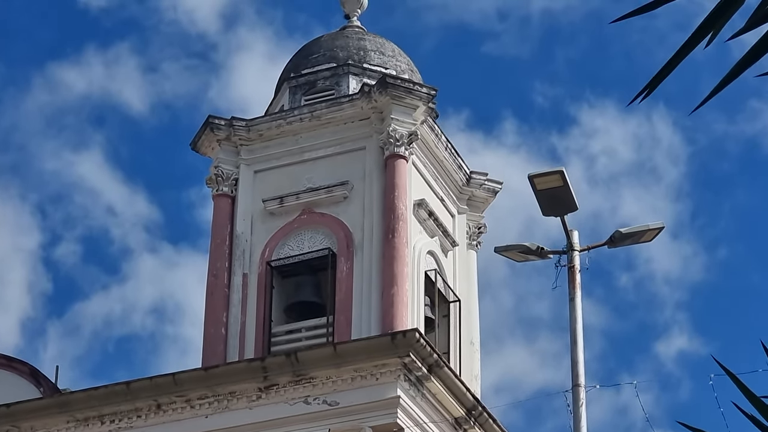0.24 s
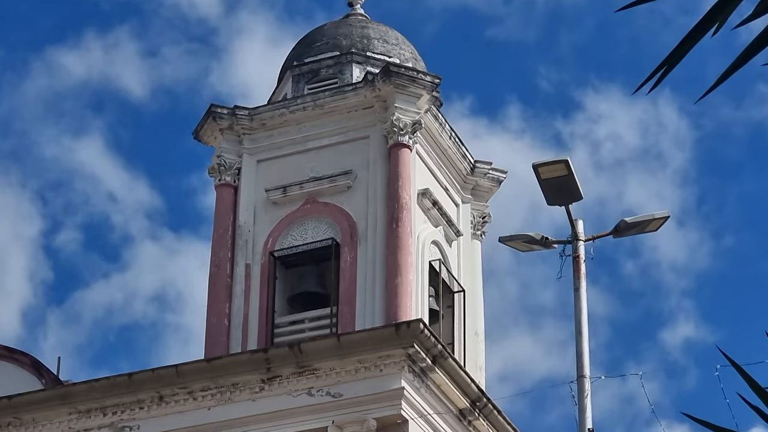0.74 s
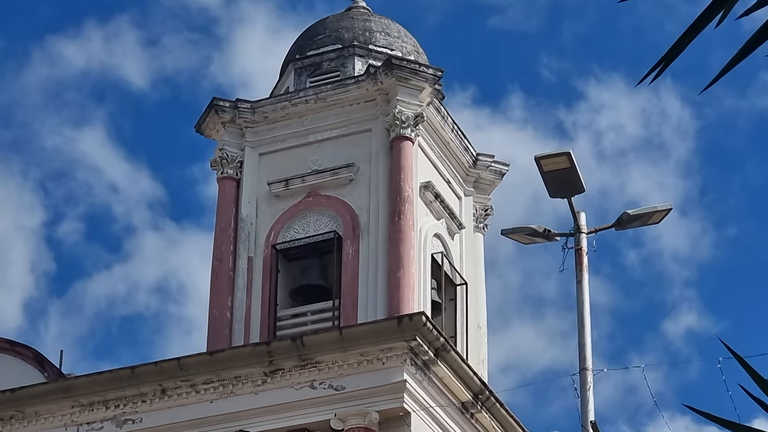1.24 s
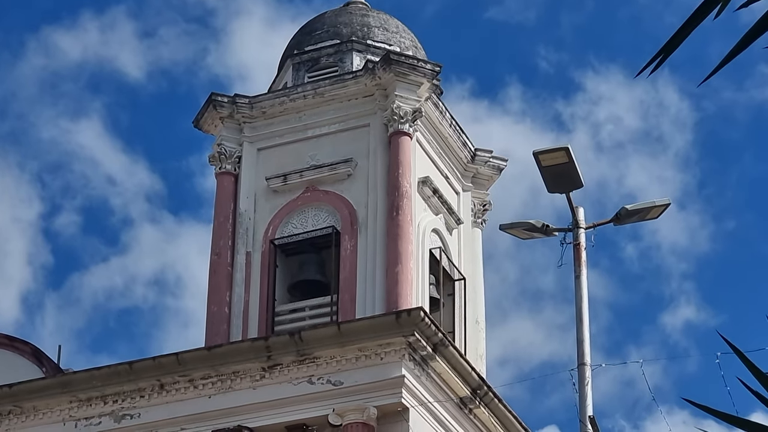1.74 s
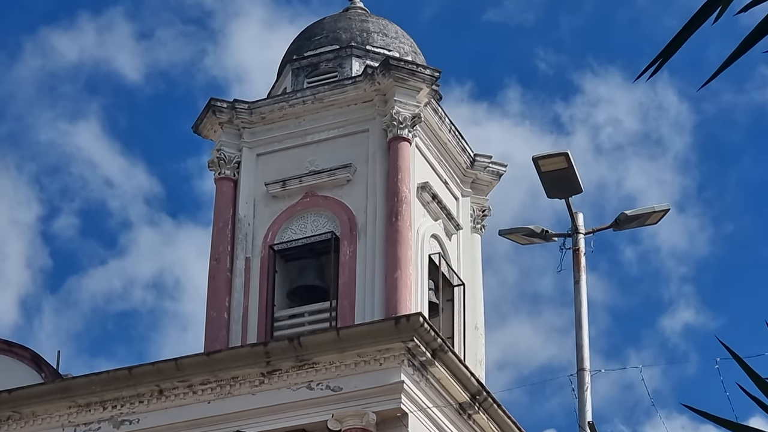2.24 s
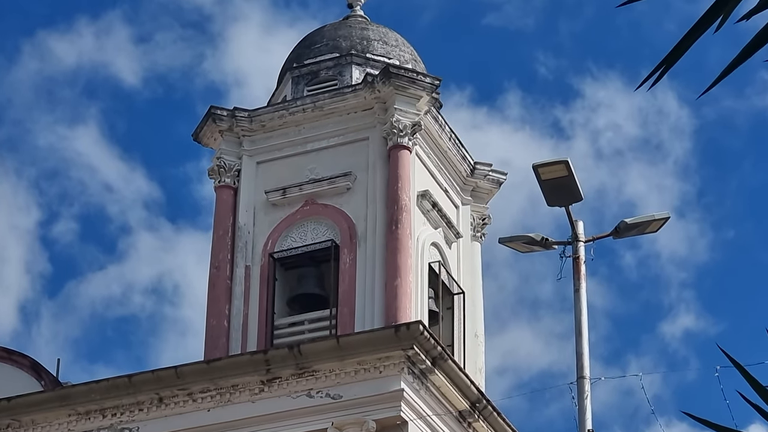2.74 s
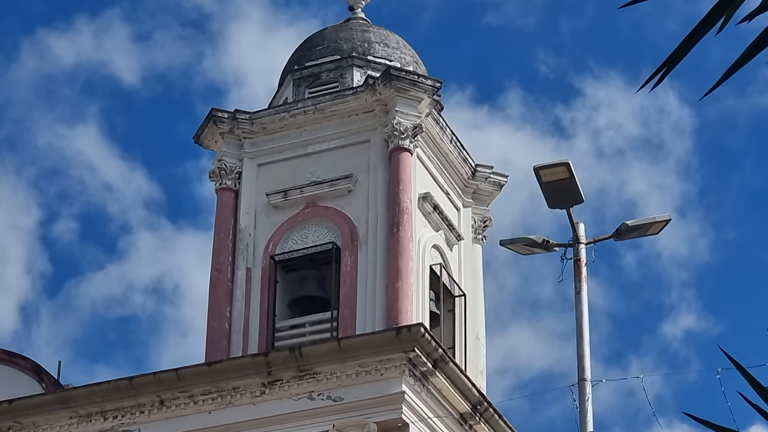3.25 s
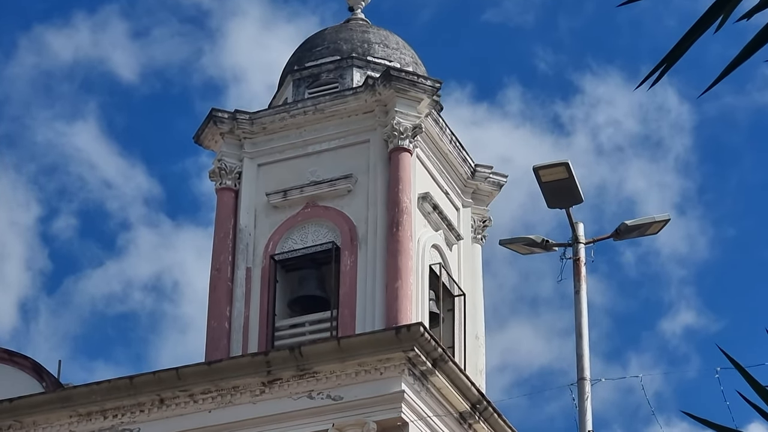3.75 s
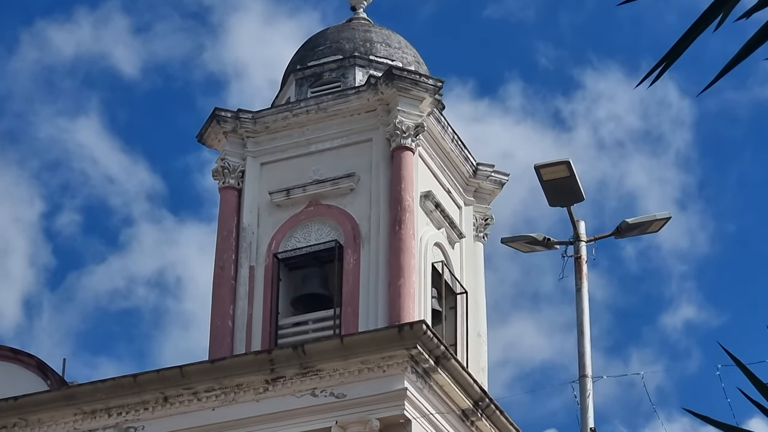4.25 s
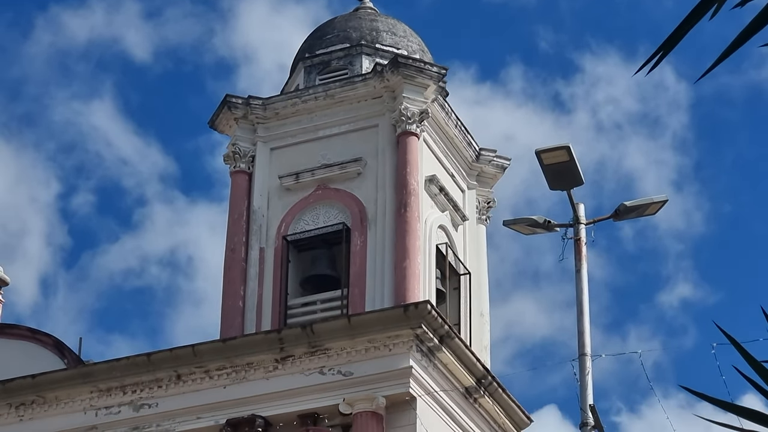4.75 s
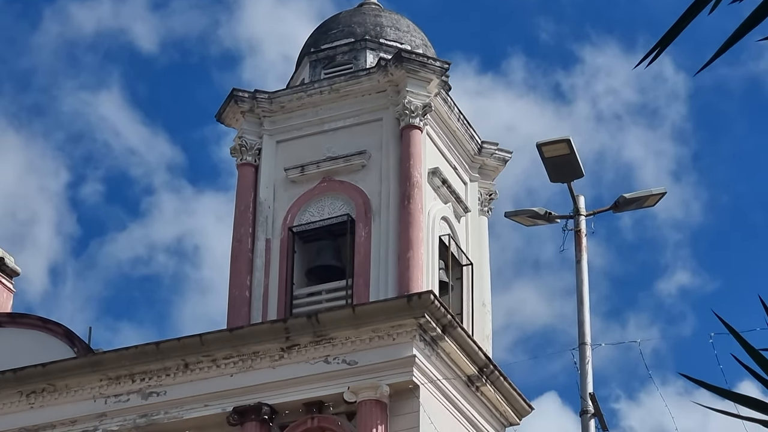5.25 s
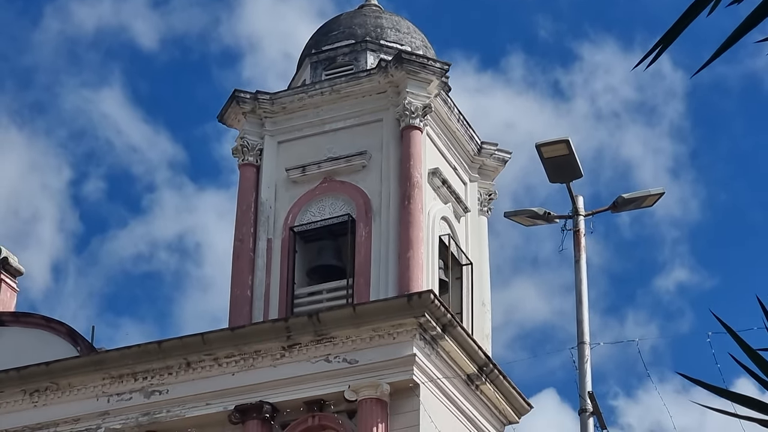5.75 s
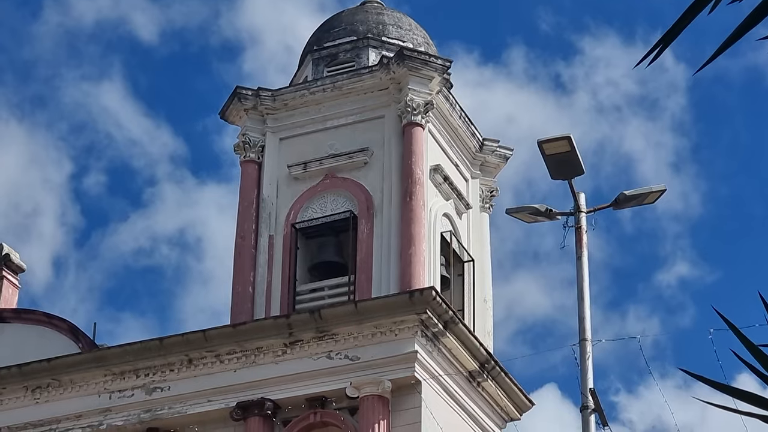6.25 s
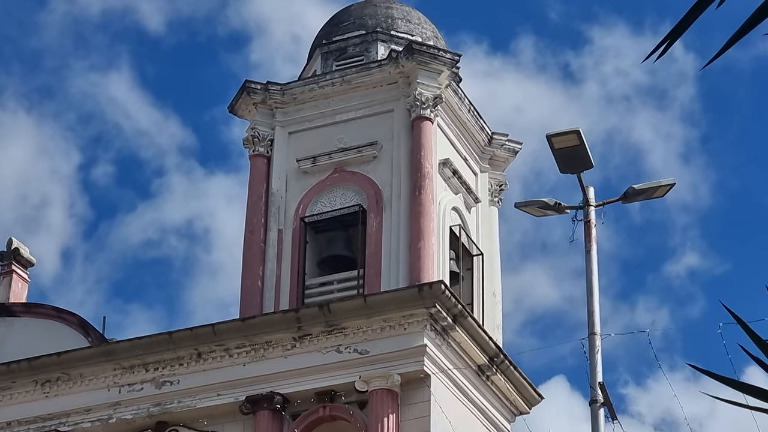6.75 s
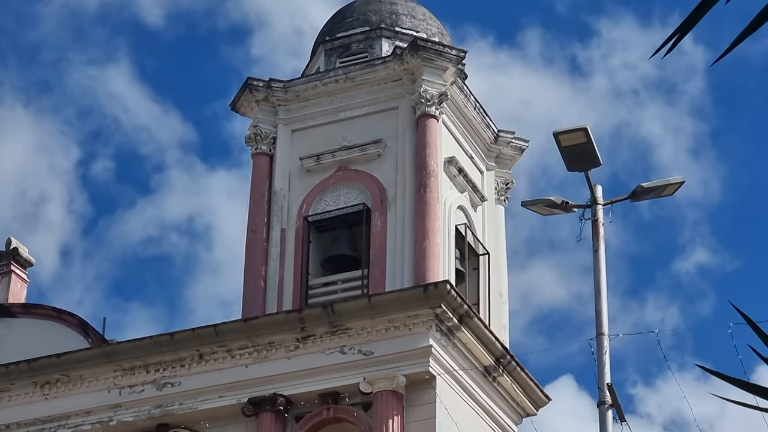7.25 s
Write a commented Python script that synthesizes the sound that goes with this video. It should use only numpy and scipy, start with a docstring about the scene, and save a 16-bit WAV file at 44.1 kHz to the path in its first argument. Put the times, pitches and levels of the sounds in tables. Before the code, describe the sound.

A large church bell is struck twice, nearly five seconds apart, each hard clang ringing bright and shimmering before fading over faint street rumble.

```python
"""Low traffic rumbles and hisses in the street below a bell tower, and a steady drone beats slowly.
A large church bell is struck, and struck again 4.7 s later: each blow is a clang of noise round the belfry.
Pairs of close partials then beat as they fade, and the deepest hum on from stroke to stroke.
Between and after the blows come a few faint ticks, made of resonant noise, and two wavering whistles.
The gain control drops at each blow and creeps back, so hum and street swell as the bell fades."""
import sys
import numpy as np
from scipy import signal
from scipy.io import wavfile
from scipy.ndimage import uniform_filter1d

SR = 44100
rng = np.random.default_rng(int(sys.argv[2]) if len(sys.argv) > 2 else 0)


def generate_wav(signal):
    """Clip the signal to [-1, 1] and save it as 16-bit WAV at the path in sys.argv[1]."""
    frames = np.transpose(np.atleast_2d(signal))
    scaled = np.clip(frames, -1, 1) * 32767
    pcm = np.round(scaled).astype(np.int16)
    wavfile.write(sys.argv[1], SR, pcm)


N = 331191

# The blows of the clapper. Each row: start in seconds, scale of the clang in dB.
STROKES = [(0.033, -17.5), (4.702, -15.5)]


def from_db(db):
    """Turn decibels into a gain."""
    return 10 ** (np.asarray(db) / 20)


def rms_one(x):
    """Scale to rms 1."""
    return x / np.sqrt(np.mean(np.abs(x) ** 2) + 1e-20)


def at_hz(points, hz):
    """Read a curve of (Hz, value) on a log-frequency axis."""
    points = np.array(points)
    return np.interp(np.log(hz), np.log(points[:, 0]), points[:, 1])


def fade(age, t60):
    """Gain of a ring that loses 60 dB in t60 seconds."""
    return np.exp(-np.log(1000) * age / t60)


def since(s):
    """First sample of an event, and the seconds elapsed from there to the end."""
    start = round(max(s, 0) * SR)
    return start, np.arange(N - start) / SR


def drift(rate_hz):
    """Random wandering of rms 1: noise through two equal one-pole lowpasses with their corner at rate_hz."""
    step = 200  # samples between drawn values, joined by straight lines
    pole = np.exp(-2 * np.pi * rate_hz * step / SR)
    white = rng.standard_normal(N // step + 502)
    slow = signal.lfilter([1], [1, -2 * pole, pole * pole], white)[500:]  # skip the filter's start
    return np.interp(np.arange(N) / step, np.arange(len(slow)), rms_one(slow))


def beating(age, twin_db, beats, lull_s):
    """A mode and its close twin drift in and out of step, opposed at lull_s and once per beat."""
    return 1 - from_db(twin_db) * np.exp(-2j * np.pi * beats * (age - lull_s))


def placed(pan_db, lead):
    """Complex left and right gains of a tone, from its level difference in dB and left phase lead in rad."""
    levels = from_db(np.array([[pan_db], [-pan_db]]) / 2)
    phases = np.exp(.5j * np.array([[lead], [-lead]]))
    return rms_one(levels * phases)


def noise_bands(count=22):
    """Diffuse stereo noise in narrow bands, as a list of (centre Hz, band); mid and side set its width."""
    # Left-right likeness of diffuse sound. Each row: frequency in Hz, correlation from -1 to 1.
    likeness = [(60, 0.9), (300, 1), (1000, -0.017), (2000, -0.49), (4000, 0.11), (10000, -0.72)]
    edges = np.geomspace(22, 16000, count + 1)
    white = rng.standard_normal((2, 2, N))
    bands = []
    for k, (low, high) in enumerate(zip(edges, edges[1:])):
        bandpass = signal.butter(3, [low, high], "band", fs=SR, output="sos")
        mid, side = signal.sosfilt(bandpass, white[k % 2])  # neighbours use different noise
        hz = np.sqrt(low * high)
        alike = np.clip(at_hz(likeness, hz), -1, 1)
        bands.append((hz, np.sqrt(1 + alike) * mid + np.sqrt(1 - alike) * side * [[1], [-1]]))
    return bands


def partials(flutter_hz=8.5, rise_s=0.012):
    """Twin modes build up in the belfry and beat; moving air and echoes make the higher ones flutter more."""
    # Ringing partials, split into close twins because the bell is not quite round.
    # Each row: frequency in Hz, level on the first and on the second stroke in dB, t60 in seconds,
    # beats per second, seconds to the first lull, twin's relative level in dB,
    # left-right difference in dB, left lead in rad.
    twin_modes = [(777.4, -38, -40.5, 4.7, 1.2, 1.06, -13.5, -6, 0.76),
                  (1009.4, -23, -18.5, 3.13, 0.93, 0.74, -5.5, -7, -0.0),
                  (1241.0, -20.5, -22, 2.61, 0.71, 0.54, -5.5, 0, -1.0),
                  (1332.3, -22, -23, 2.98, 0.78, 0.26, -9, -2.5, -1.27),
                  (1400.3, -23, -23, 2.78, 0.76, 0.23, -3, -1, -1),
                  (1514.7, -17.5, -17.5, 5.47, 2.508, 0.17, -4.5, -5.0, -1),
                  (1638.5, -18.5, -20, 2.76, 0.39, 0.15, -5.5, -3.5, -1.2),
                  (2070, -33.5, -52.5, 0.44, 0.75, 0.31, -8, -7, 5),
                  (2084.5, -20, -19.5, 3.26, 2.56, 0.39, -8, -8.5, 1.96),
                  (2200, -23.5, -30.5, 1.5, 0.45, 0.07, -5, -11, -2.2),
                  (2315, -28.5, -24, 2.39, 0.76, 0.22, -9, -5.5, 0.4),
                  (2350, -29, -36, 1.5, 0.72, 0.14, -9.5, -12, 4.5),
                  (2705, -9, -11.5, 3.16, 2.874, 0.016, -8, -10.5, 4),
                  (2934, -27.5, -31.5, 2, 1.4, 0.34, -15.5, -9.5, -4.5),
                  (3107, -24.5, -32.5, 2.2, 1, 0.15, -20, -10, -1.5),
                  (3364, -10, -11.5, 1.94, 0.52, 0.43, -1.5, -6.5, -2),
                  (3538, -47, -40, 2.4, 1.8, 0.13, -4, -13, 16.5),
                  (3934, -30, -33, 3.15, 0.62, 0.74, -3, -6, -2),
                  (4043, -17, -17, 2.365, 2.98, 0.057, -6.5, -6, -1.7),
                  (4600, -28.5, -46, 1.4, 0.71, 0.09, -15.5, -5, 4.5),
                  (4745, -15.5, -14, 1.94, 0.91, 0.54, -8.5, -12, -0.6),
                  (4840, -22, -20.5, 1.52, 0.62, 0.05, -6.5, -11, -1.8),
                  (4955.0, -31, -44, 3.1, 1.5, 0.26, -7.5, -10.5, 3),
                  (5430, -28, -37, 1.7, 0.74, 0.41, -4.5, 1, 5),
                  (6040, -43.5, -41, 1.8, 2.6, 0.13, -6, 14.5, 4),
                  (7000, -47, -36.5, 1.3, 2.2, 0.07, -15.5, 9, 0)]
    # A third close mode makes some beating uneven; a row acts only on partials within 40 Hz.
    # Each row: frequency of the partial in Hz, relative level in dB, beats per second,
    # seconds to the first lull.
    third_modes = [(1009, -5.5, 0.58, 0.29), (1514.7, -11, 0.82, 0.68), (2704, -10, 1.25, 0.76),
                   (3363, -10, 1.47, 0.12), (4044.3, -12, 1.12, 0.67), (4690, 4, 2.69, 0.046)]
    out = np.zeros((2, N))
    t = np.arange(N) / SR
    for hz, first_db, second_db, t60, beats, lull_s, twin_db, pan_db, lead in twin_modes:
        age = t[:int(t60 * 1.2 * SR)]  # until 72 dB down
        beat = beating(age, twin_db, beats, lull_s)
        for partial_hz, third_db, third_beats, third_lull_s in third_modes:
            if abs(hz - partial_hz) < 40:
                beat = beat * beating(age, third_db, third_beats, third_lull_s)
        carrier = np.exp(2j * np.pi * (hz * age + rng.random()))
        ring = beat * carrier * fade(age, t60) * (1 - np.exp(-age / rise_s))
        tone = np.zeros(N, complex)
        for (s, _), db in zip(STROKES, (first_db, second_db)):
            start = round(s * SR)
            tone[start:start + len(ring)] += from_db(db) * ring[:N - start]
        depth = .24 * hz / 3500
        flutter = 1 + depth * (drift(flutter_hz) + 1j * drift(flutter_hz))
        tone *= flutter / np.sqrt(1 + 2 * depth ** 2)  # keeps the mean power
        for ear, heard in zip(out, placed(pan_db, lead) * tone):
            ear += heard.real * (1 + .5 * depth * drift(flutter_hz))  # each side also flutters alone
    return out


def clang(tail_db=-31, tail_t60=3.2, knock_db=-1.5, knock_t60=0.14, rise_s=0.0039):
    """The hard knock of the clapper, its scatter off the belfry walls, and a faint longer tail."""
    # Spectrum of the clang. Each row: frequency in Hz, relative density in dB per Hz.
    spectrum = [(100, -27.5), (260, -18.5), (370, -25), (520, -13), (720, -5.5), (1050, 2), (1400, 13),
                (1800, -1.5), (2400, 4.5), (3700, -10.5), (4900, -4), (6500, -31.5), (10000, -40.5),
                (15000, -35)]
    # Decay of the scatter. Each row: frequency in Hz, t60 in seconds.
    scatter_t60 = [(200, 0.25), (1000, 0.25), (3000, 0.76), (6000, 0.22), (14000, .5)]
    bands = [(hz, band * from_db(at_hz(spectrum, hz))) for hz, band in noise_bands()]
    total = np.std(sum(band for _, band in bands))
    out = np.zeros((2, N))
    for s, db in STROKES:
        start, age = since(s)
        rise = 1 - np.exp(-age / rise_s)
        knock = from_db(knock_db) * fade(age, knock_t60)
        tail = from_db(tail_db) * fade(age, tail_t60)
        for hz, band in bands:
            dying = knock + fade(age, at_hz(scatter_t60, hz)) + tail
            out[:, start:] += from_db(db) / total * band[:, start:] * dying * rise
    return out * placed(-2.5, 0).real


def clonk(rise_s=0.012):
    """Each blow also wakes a few heavily damped resonances that give it weight."""
    # Damped resonances of the blow. Each row: frequency in Hz, level in dB, t60 in seconds.
    resonances = [(477.3, -25.5, 0.5), (1007, -20.5, 0.88), (1370, -33.5, .6)]
    out = np.zeros((2, N))
    for s, _ in STROKES:
        start, age = since(s)
        rise = 1 - np.exp(-age / rise_s)
        for hz, db, t60 in resonances:
            out[:, start:] += from_db(db) * np.sin(2 * np.pi * hz * age) * fade(age, t60) * rise
    return out


def shimmer(count=230, throb=0.42, rise_s=0.006):
    """Many weak, short-lived, throbbing modes fill the gaps between partials; both blows wake the same ones."""
    # Middle level of the crowd of upper modes. Each row: frequency in Hz, level in dB.
    mode_level = [(1300, -38.5), (2300, -31), (3500, -45), (5000, -34), (6300, -54.5), (9000, -55.5),
                  (13500, -57.5), (15500, -71.5)]
    # Their middle decay. Each row: frequency in Hz, t60 in seconds.
    mode_t60 = [(1300, 0.8), (5000, 1.28), (9000, 1.4), (13800, 0.83), (15000, 0.5)]
    # Where they are heard. Each row: frequency in Hz, left-right difference in dB.
    mode_pan = [(1300, 12.5), (2500, 3), (5000, -1), (8000, 4), (13000, -5.5)]
    out = np.zeros((2, N))
    age = np.arange(2 * SR) / SR
    rise = 1 - np.exp(-age / rise_s)
    # jittered steps on a square-root scale: wider apart towards the top
    low, high = np.sqrt(1300), np.sqrt(15300)
    steps = (np.arange(count) + rng.uniform(-1, 1, count)) / count
    pitches = (low + (high - low) * steps) ** 2
    chances = rng.uniform(-0.9, 1, (count, 6))
    for hz, (size, life, side, lead, turn, beats) in zip(pitches, chances):
        t60 = at_hz(mode_t60, hz) * (1 + .25 * life)
        dying = fade(age, t60) - fade(age[-1], t60)  # reaches zero after two seconds
        gain = from_db(at_hz(mode_level, hz) + 6 * size) * dying * rise
        gain *= 1 + throb * np.cos(2 * np.pi * (8 * beats * age + turn))  # up to 8 beats per second
        pan_db = at_hz(mode_pan, hz) + 5 * side
        tone = placed(pan_db, np.pi * lead) * np.exp(2j * np.pi * (hz * age + turn))
        out[:, :len(age)] += tone.real * gain
    return sum(np.roll(out, round(s * SR), axis=1) for s, _ in STROKES)


def hum(waver=0.086, rise_s=0.015):
    """Each blow sets the deep twins ringing afresh, in a new balance; they beat slowly and fade slowly."""
    # Deep twin partials that outlast the gap between strokes.
    # Each row: frequency in Hz, level on the first and on the second stroke in dB,
    # twin's relative level on the first and on the second in dB, t60 in seconds, beats per second,
    # seconds to the first lull, left-right difference in dB, left lead in rad.
    deep_modes = [(260.3, -44, -36.5, -32, -1.5, 50, 0.4, 0.63, 0, -0.12),
                  (480.1, -47, -35, -3.5, -9, 45, 0.12, 1.38, -3.5, 0.88),
                  (596.6, -37, -39, -5.5, -6.5, 16.4, 0.25, 3.3, -0.5, -0.42)]
    out = np.zeros((2, N))
    t = np.arange(N) / SR
    for hz, first_db, second_db, first_twin_db, second_twin_db, t60, beats, lull_s, pan_db, lead in deep_modes:
        swell = np.zeros(N)
        for (s, _), db, twin_db in zip(STROKES, (first_db, second_db), (first_twin_db, second_twin_db)):
            start, age = since(s)
            fresh = from_db(db) * np.abs(beating(age, twin_db, beats, lull_s)) * fade(age, t60)
            # the new ring takes over from the old one
            swell[start:] += (fresh - swell[start:]) * (1 - np.exp(-age / rise_s))
        tone = (placed(pan_db, lead) * np.exp(2j * np.pi * hz * t)).real
        out += tone * swell * (1 + waver * drift(6))
    return out


def drone(hz=287.8, level_db=-53, t60=90, beats=0.513, lull_s=1.02, twin_db=-1.5):
    """Two nearly equal twins almost cancel about every two seconds, perhaps a neighbouring bell still humming."""
    t = np.arange(N) / SR
    twins = beating(t, twin_db, beats, lull_s)
    return from_db(level_db) * (twins * np.exp(2j * np.pi * hz * t)).real * fade(t, t60)


def street(hiss_db=-61.5, lumpy_db=1.5, hiss_pan_db=-3.5):
    """Traffic rumbles unevenly under a soft hiss; both are banded noise, and the hiss bands flicker slightly."""
    # Level of the traffic rumble. Each row: time in seconds, level in dB.
    rumble_level = [(0, -52.5), (3.2, -55.5), (4.1, -52), (5, -58), (7.5, -59)]
    # Spectra of rumble and of hiss. Each row: frequency in Hz, relative density in dB per Hz.
    rumble_spectrum = [(25, -27.5), (45, -14), (65, 2), (90, 4.5), (120, 0.5), (160, -19), (250, -6),
                       (400, -37), (800, -55)]
    hiss_spectrum = [(150, 3.5), (400, 7.5), (800, 4.5), (1500, -1), (2200, 3.5), (3200, 0.5), (4300, -8.5),
                     (5400, -12.5), (6800, -38.5), (9000, -33.5), (12500, -27.5), (15500, -44)]
    bands = noise_bands()
    rumble = rms_one(sum(band * from_db(at_hz(rumble_spectrum, hz)) for hz, band in bands))
    hiss = rms_one(sum(band * from_db(at_hz(hiss_spectrum, hz) + lumpy_db * drift(6.6)) for hz, band in bands))
    seconds, levels_db = np.transpose(rumble_level)
    rumble_gain = from_db(np.interp(np.arange(N) / SR, seconds, levels_db))
    return rumble * rumble_gain + hiss * from_db(hiss_db) * placed(hiss_pan_db, 0).real


def ticks(sharpness=2.0):
    """Each tick is a short, dying burst of noise in one broad resonance."""
    # Small ticks, scuffs and a knock nearby.
    # Each row: start in seconds, level before the fade in dB, centre in Hz, t60 in seconds.
    tick_rows = [(1.709, -62, 5570, 0.023), (2.42, -61, 2900, 0.76), (3.361, -68.5, 5770, 0.047),
                 (3.408, -74, 5800, .05), (3.992, -67, 5600, .03), (4.168, -70.5, 5800, .04),
                 (4.318, -71, 5600, .03), (4.428, -58.5, 2510, 1), (6.49, -69, 5630, .05),
                 (7.028, -55.5, 2960, 0.28), (7.08, -71, 5800, .04), (7.244, -69, 5470, 0.038),
                 (7.373, -71, 5370, 0.044)]
    out = np.zeros((2, N))
    for s, db, hz, t60 in tick_rows:
        start, age = since(s)
        age = age[:SR // 2]
        b, a = signal.iirpeak(hz, sharpness, fs=SR)
        burst = rng.standard_normal((2, len(age)))
        for _ in range(2):
            burst = signal.lfilter(b, a, burst)
        out[:, start:start + len(age)] += from_db(db) * rms_one(burst) * fade(age, t60)
    return out


def whistles(waver_hz=18):
    """Each whistle is a sine that swells and fades on one unsteady pitch."""
    # Faint whistles far down the street.
    # Each row: start in seconds, length in seconds, frequency in Hz, peak level in dB.
    whistle_rows = [(2.38, 0.37, 2965, -64.5), (4.0, 0.39, 2130, -69)]
    out = np.zeros(N)
    t = np.arange(N) / SR
    for s, length, hz, db in whistle_rows:
        swell = np.sin(np.pi * np.clip((t - s) / length, 0, 1))
        turns = np.cumsum(hz + waver_hz * drift(32)) / SR
        out += from_db(db) * swell * np.sin(2 * np.pi * turns)
    return out


def gain_control(x, ceiling_db=-10, recovery_db_per_s=2, max_gain_db=12):
    """The gain drops at once to hold a loud sound to the ceiling, and recovers at a steady rate."""
    power = uniform_filter1d(np.mean(x ** 2, axis=0), size=SR // 25)  # 40 ms average
    level_db = 10 * np.log10(np.maximum(power, 1e-12))
    recovered_db = recovery_db_per_s * np.arange(N) / SR
    # the highest level so far, sinking at the recovery rate
    held_db = np.maximum.accumulate(level_db + recovered_db) - recovered_db
    return x * from_db(np.minimum(ceiling_db - held_db, max_gain_db))


def scene():
    """The bell above the street."""
    return partials() + hum() + drone() + shimmer() + clang() + clonk() + street() + ticks() + whistles()


def record(dry):
    """The gain rides the level, both ends fade over 8 ms, the highest peaks are rounded and the top is cut."""
    from_end = np.minimum(np.arange(N), np.arange(N)[::-1])  # samples to the nearer end
    opened = gain_control(dry) * np.minimum(from_end / (.008 * SR), 1)
    rounded = opened / (1 + (opened / .97) ** 12) ** (1 / 12)
    top_cut = signal.cheby2(14, 70, 16200, fs=SR, output="sos")  # 70 dB down from 16200 Hz up
    return signal.sosfilt(top_cut, rounded)


dry = scene()
out = record(dry)
generate_wav(out)
```